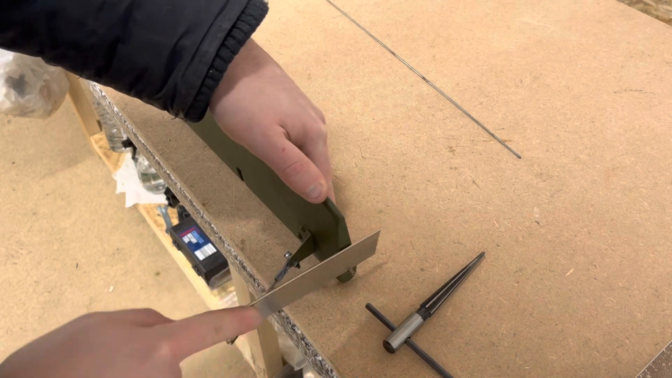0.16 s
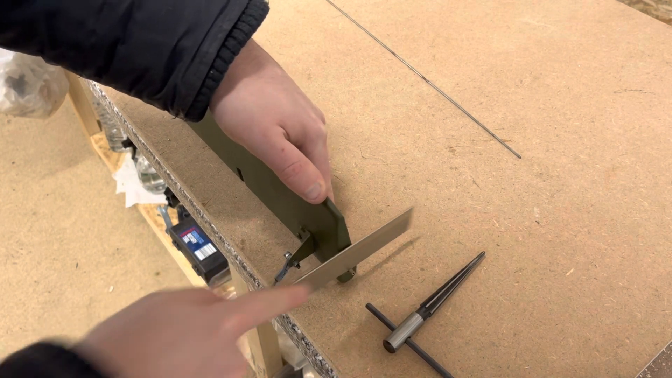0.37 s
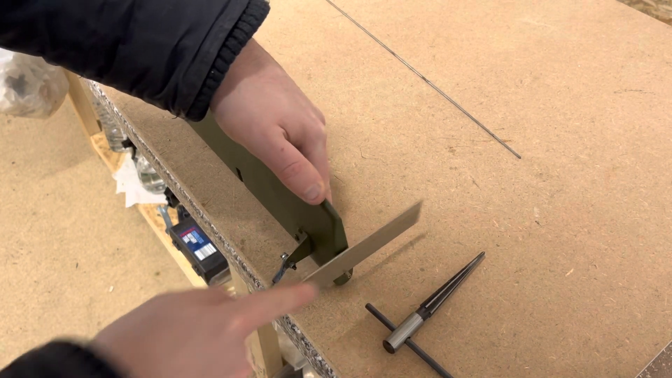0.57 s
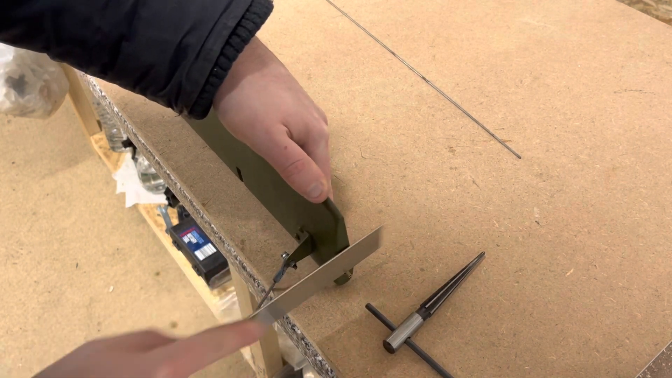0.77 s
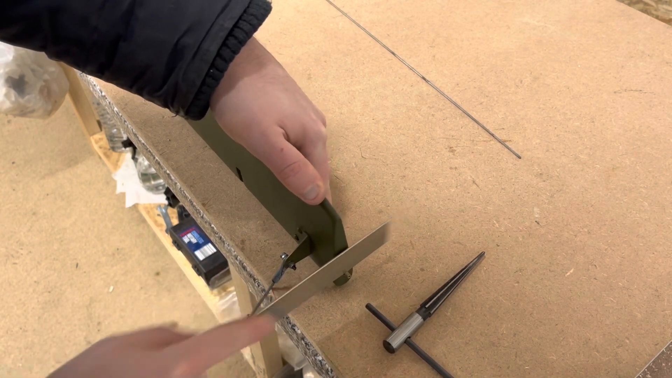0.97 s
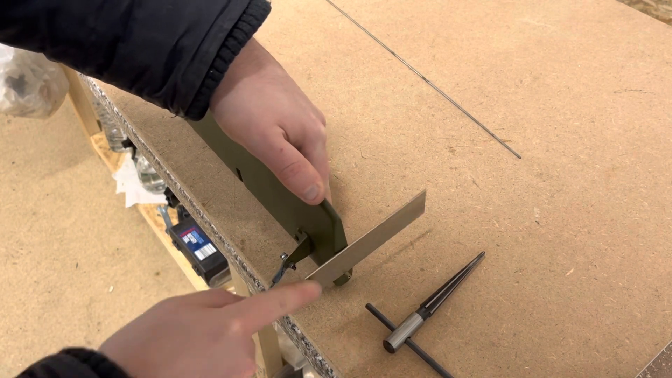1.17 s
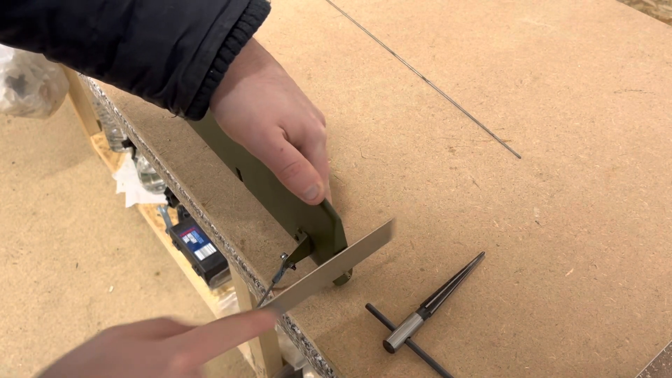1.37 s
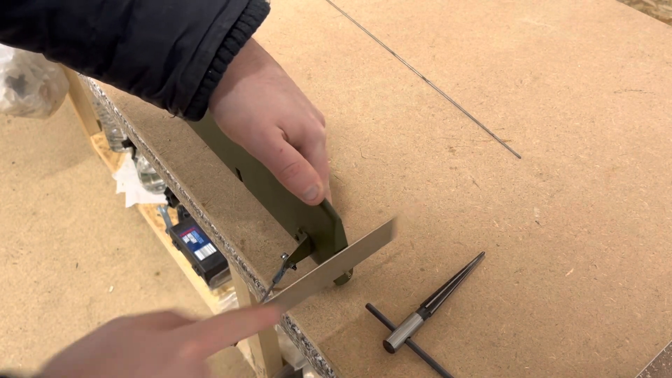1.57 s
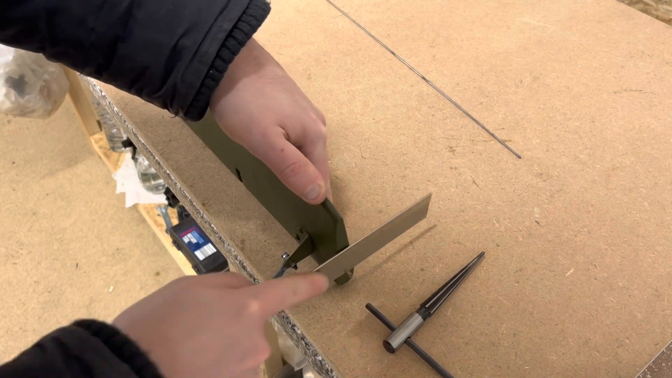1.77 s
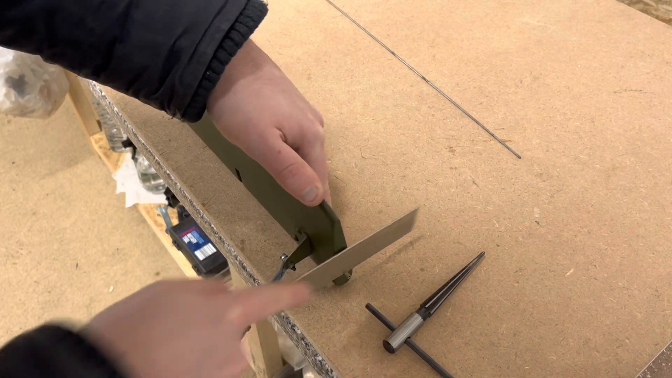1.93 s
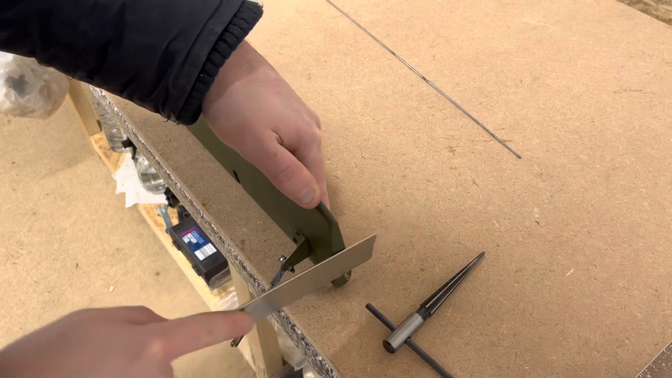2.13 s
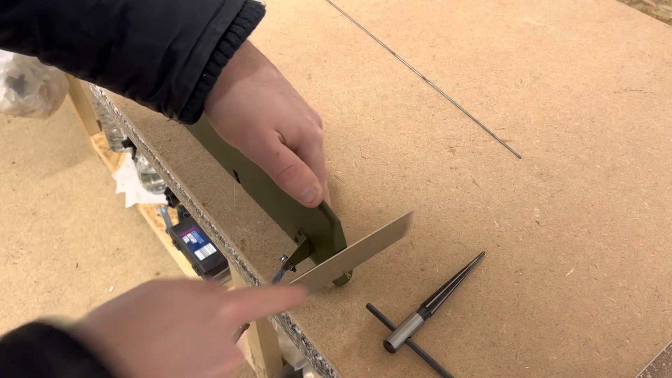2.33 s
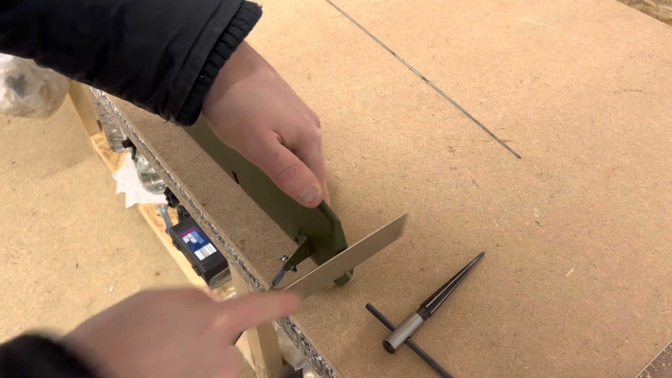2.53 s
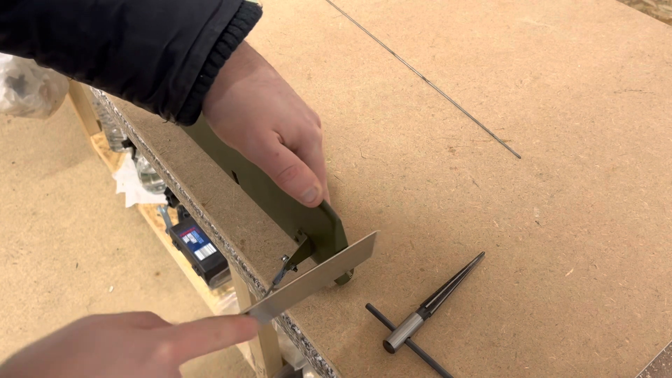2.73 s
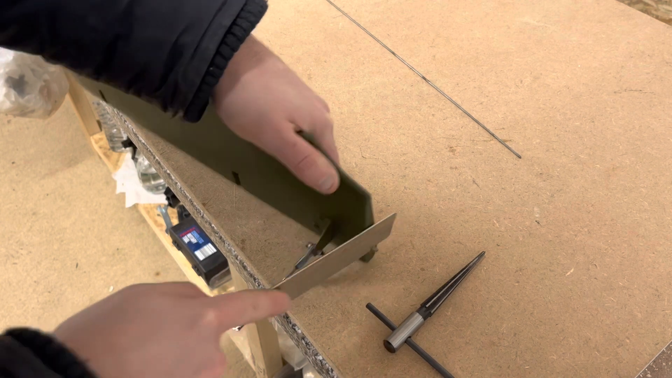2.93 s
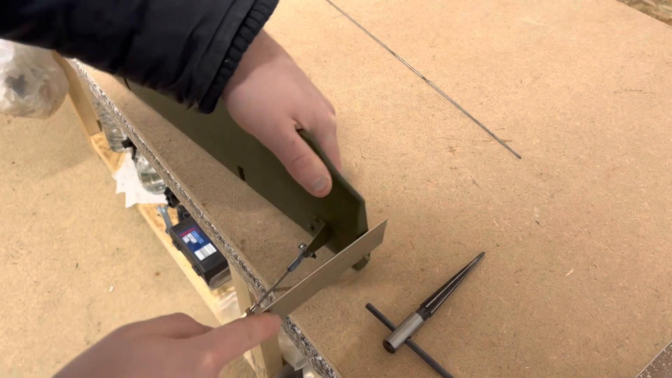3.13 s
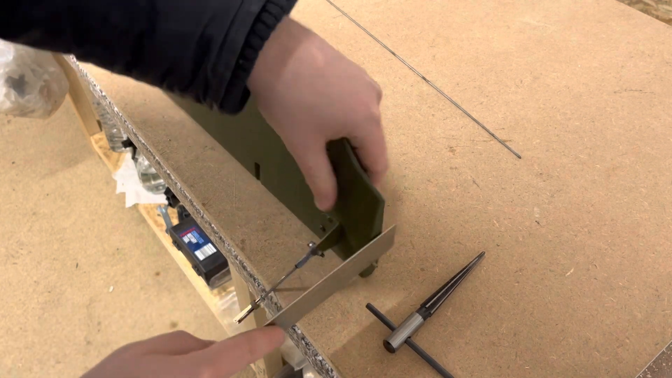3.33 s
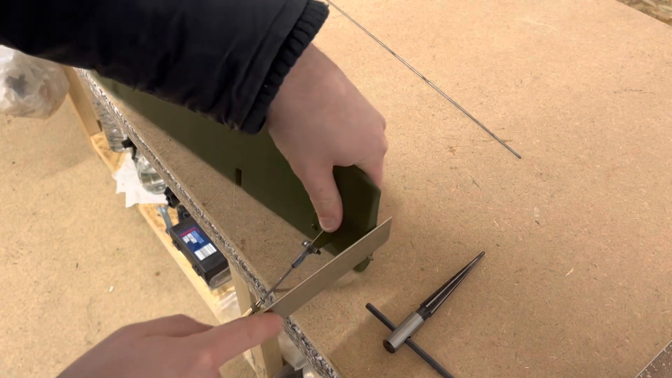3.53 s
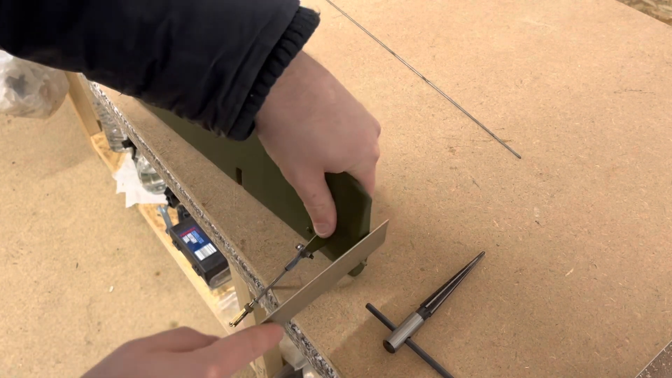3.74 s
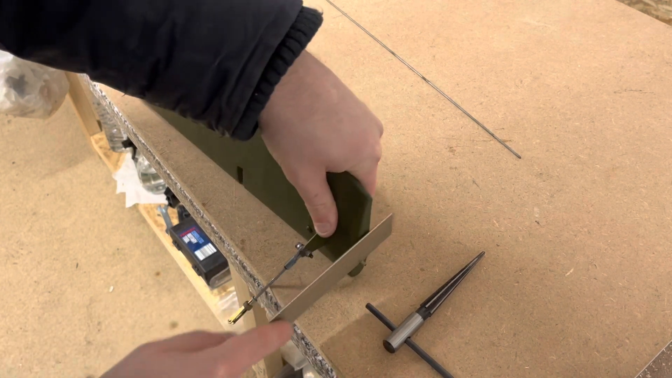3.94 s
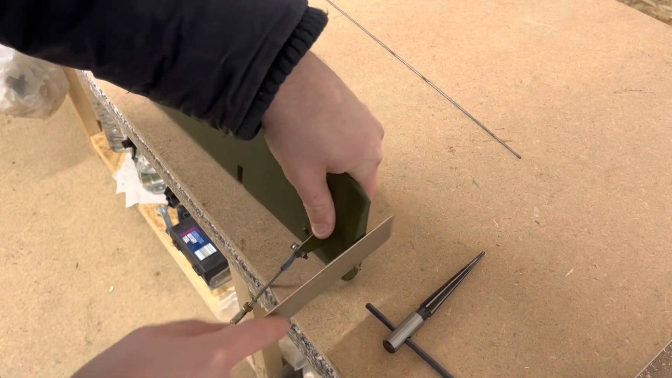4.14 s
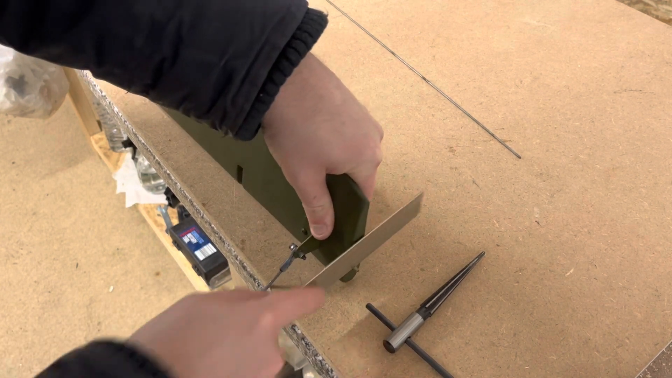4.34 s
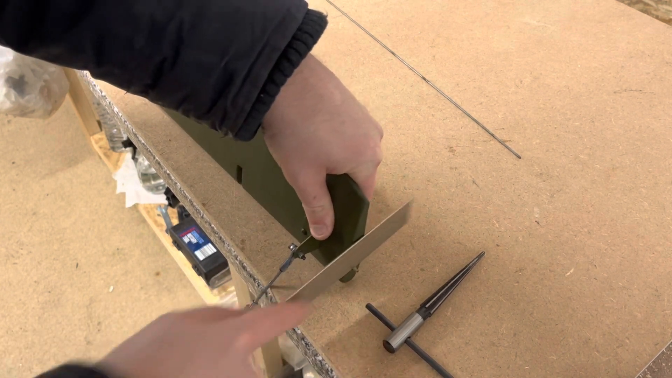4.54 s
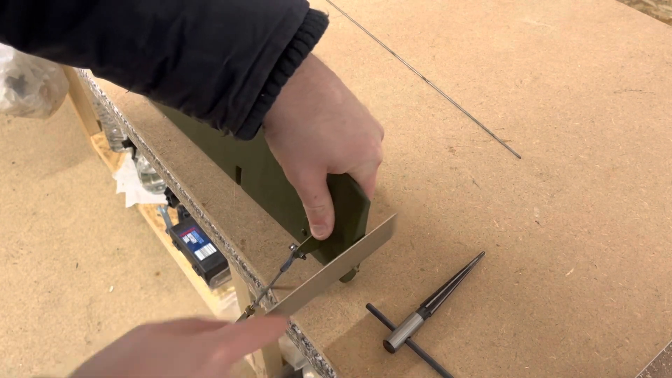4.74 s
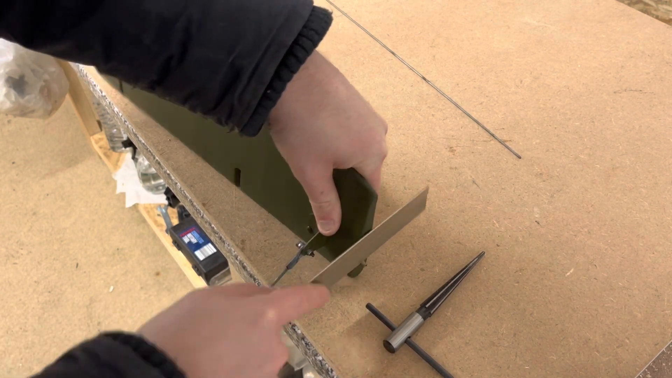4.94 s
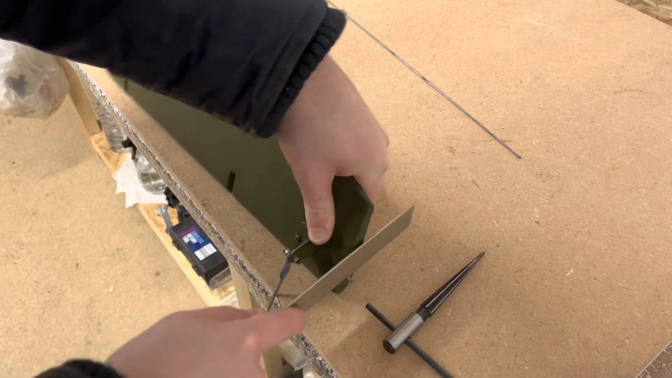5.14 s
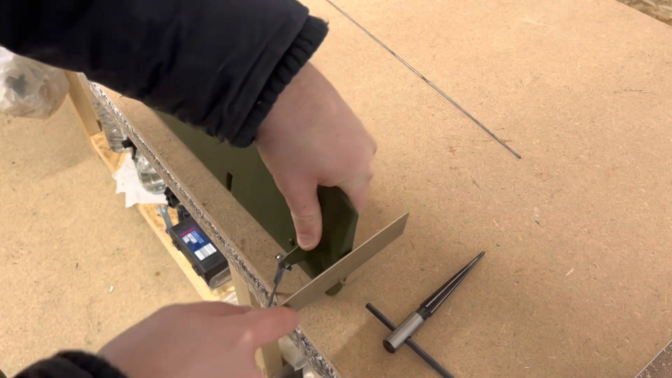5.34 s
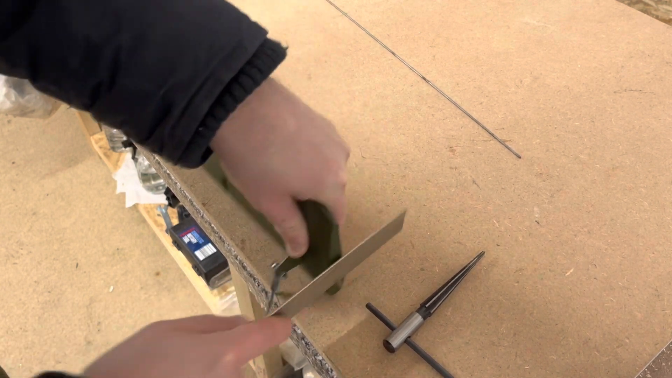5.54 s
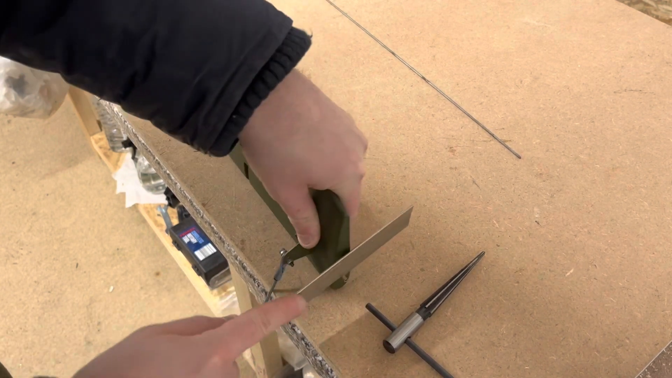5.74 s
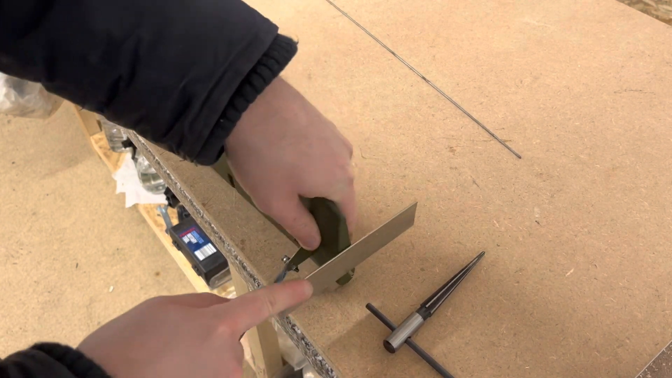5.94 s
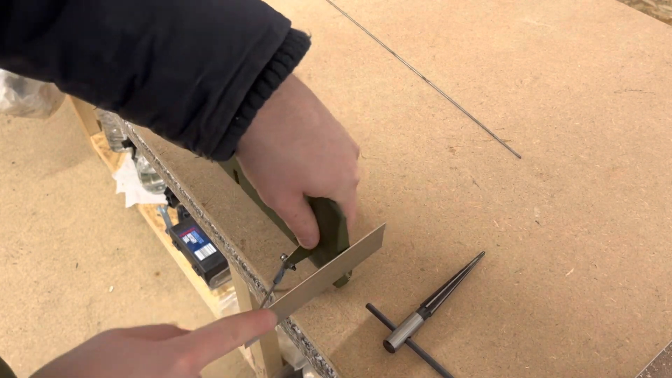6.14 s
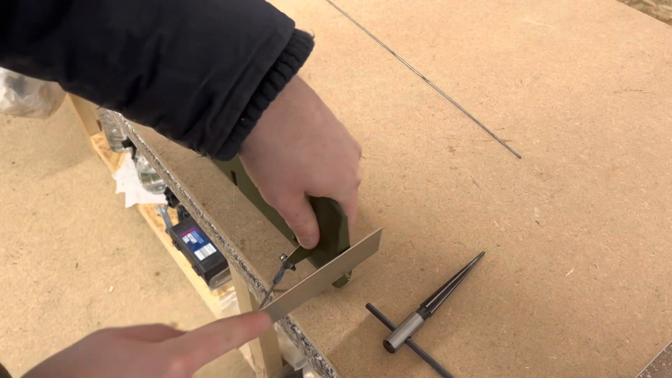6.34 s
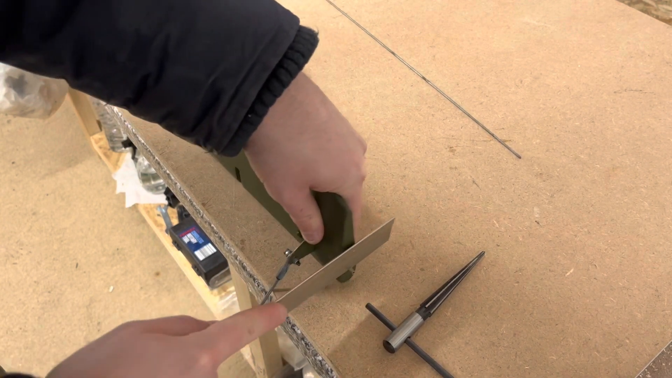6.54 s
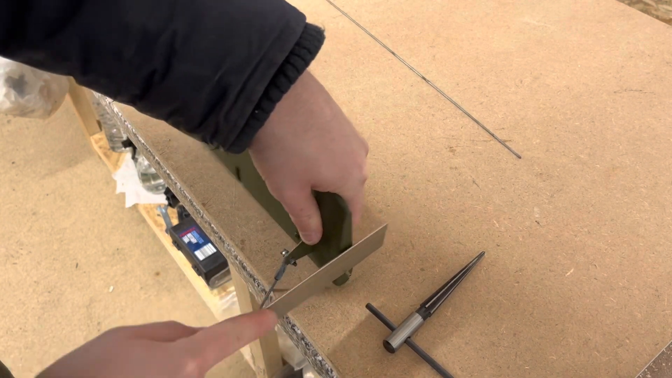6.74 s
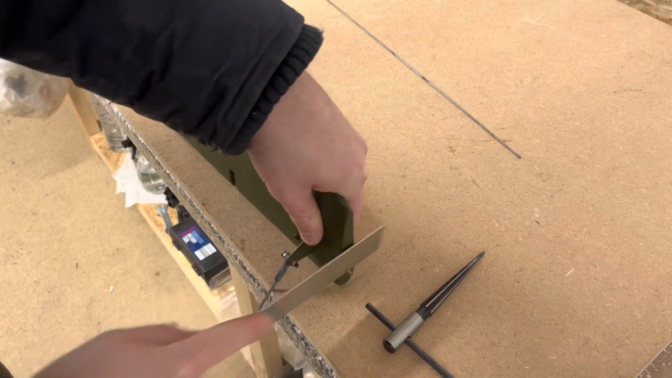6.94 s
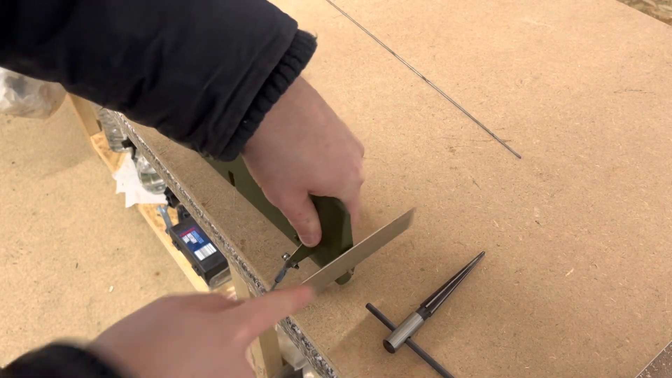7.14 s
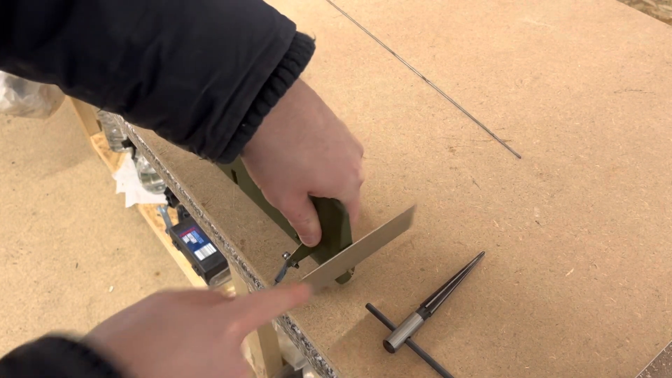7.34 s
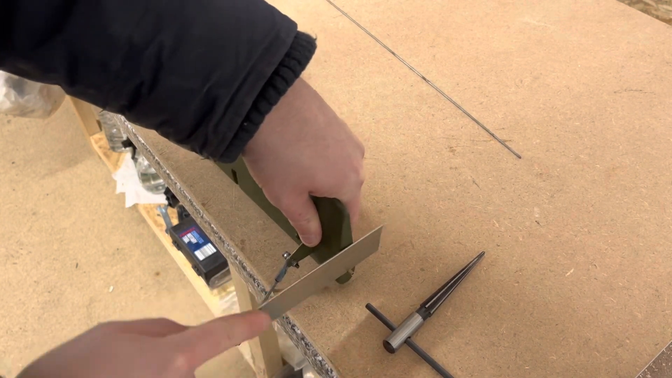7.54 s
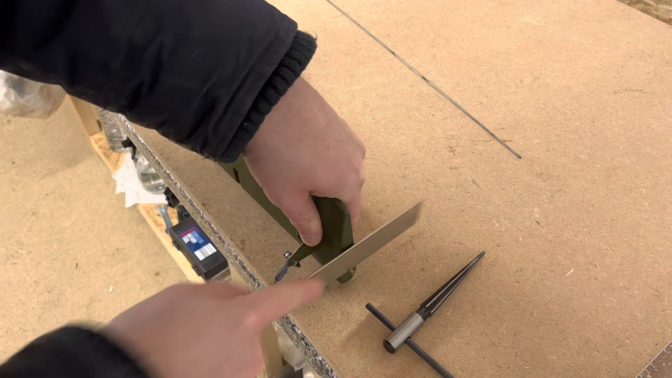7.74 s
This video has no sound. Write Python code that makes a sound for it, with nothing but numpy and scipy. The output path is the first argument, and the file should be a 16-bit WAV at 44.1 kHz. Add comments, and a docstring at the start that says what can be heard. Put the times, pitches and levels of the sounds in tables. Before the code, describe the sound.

Close up indoors, a fine-toothed saw cuts a small brass tube in very fast, even back-and-forth strokes, each a buzzy metallic chirp over gritty scraping. It stops for about a second with light rubs and clicks, resumes with more bench resonance, falters into weak strokes and knocks, rests again, then builds back to steady rapid sawing.

```python
"""Sawing a brass tube at the bench

A fine-toothed hand saw cuts a small brass tube held in a vice on a wooden bench, close to a phone.
In each stroke the blade speeds up and slows down: the pitch of the tooth strikes makes an arch over
a noisy metal scrape, while vice and bench answer lower down. In the pauses a hand rubs softly over
the vice, and in and around them small metal knocks sound. Short wall echoes and quiet air surround it."""
import sys
import numpy as np
from scipy import signal
from scipy.fft import rfft, irfft, next_fast_len
from scipy.io import wavfile
from scipy.ndimage import uniform_filter1d, map_coordinates

SR = 44100
rng = np.random.default_rng(int(sys.argv[2]) if len(sys.argv) > 2 else 0)


def waveform_to_disk(signal):
    """Save audio, clipped to [-1, 1], as 16-bit WAV at the path in sys.argv[1]."""
    frames = np.transpose(np.atleast_2d(signal))
    scaled = np.clip(frames, -1, 1) * 32767
    samples = np.round(scaled).astype(np.int16)
    wavfile.write(sys.argv[1], SR, samples)


N = 343980
TIME = np.arange(N) / SR

# Half strokes, mostly pushes and pulls; the faint rows at 4.954 and 5.03 s go with knocks:
# (start [s], basic top tooth rate [Hz], relative teeth level [dB], relative scrape level [dB])
STROKES = [(-.04, 1100, -29.5, -29), (.03, 1360, -25.5, -33), (.106, 1250, -26, -32),
           (.181, 1150, -28.5, -34), (.268, 1100, -30, -33), (.337, 1090, -26.5, -34.5),
           (.414, 786.4, -28, -33), (.485, 1000, -26.5, -37.5), (.561, 1130, -27.5, -32),
           (.64, 1080, -26.5, -32.5), (.719, 1150, -25.5, -33), (.795, 1160, -30, -34.5),
           (.877, 1090, -29, -34), (.952, 1080, -27.5, -37), (1.033, 1030, -30.5, -35.5),
           (1.101, 1140, -26.5, -34), (1.179, 1170, -27.5, -33), (1.254, 1140, -28.5, -33.5),
           (1.329, 1030, -26.5, -32.5), (1.403, 1110, -28.5, -33.5), (1.479, 1140, -31.5, -35),
           (1.553, 1120, -27, -32.5), (1.631, 1030, -29.5, -32.5), (1.703, 1080, -25, -31.5),
           (1.782, 1060, -24.5, -32.5), (1.852, 1070, -23.5, -32.5), (1.922, 1020, -28, -32),
           (1.995, 960, -23, -31.5), (2.071, 1320, -28.5, -26.5), (2.146, 1140, -28, -33),
           (2.221, 1210, -24.5, -27.5), (2.3, 1370, -23, -30), (2.372, 1140, -27.5, -28.5),
           (2.443, 1308, -24.5, -31), (2.534, 1032, -31.5, -32), (2.592, 1070, -25.5, -32),
           (2.671, 1200, -26.5, -27.5), (2.745, 1140, -23, -29.5), (2.819, 1060, -28.5, -29),
           (3.91, 1123, -29, -31), (4.045, 1050, -25.5, -31), (4.132, 1160, -26.5, -31),
           (4.215, 1050, -29, -30), (4.288, 1160, -26, -30.5), (4.364, 1120, -29, -30.5),
           (4.437, 1160, -28, -33.5), (4.51, 1070, -29, -30), (4.584, 1140, -27.5, -31),
           (4.66, 1140, -30, -31.5), (4.73, 1150, -29, -32), (4.804, 1099, -29.5, -29),
           (4.873, 1170, -31.5, -32.5), (4.954, 639.2, -43, -46), (5.03, 761.1, -58, -50.5),
           (5.128, 600.8, -31.5, -40), (5.173, 600.4, -33.5, -39.5), (5.255, 710, -38, -40),
           (6.0, 750.8, -40.5, -51.5), (6.066, 643, -38, -45), (6.158, 790, -31, -35.5),
           (6.254, 810, -30, -32), (6.348, 603.3, -33.5, -41), (6.57, 810, -32, -37.5),
           (6.661, 840, -34, -39), (6.757, 1050, -29, -32), (6.856, 1000, -33, -32), (6.932, 940, -29, -32),
           (7.015, 929.2, -31, -30), (7.09, 1150, -30.5, -31), (7.175, 1170, -31, -30),
           (7.251, 1160, -27.5, -30.5), (7.329, 1150, -29.5, -30), (7.402, 1200, -28.5, -30.5),
           (7.482, 1160, -26.5, -28), (7.55, 1140, -26, -30.5), (7.625, 962, -30, -32),
           (7.693, 1147, -27, -30), (7.765, 1215, -28, -31)]
# Resonances of blade and tube: (pitch [Hz], width [Hz], level [dB])
BLADE_MODES = [(762, 250, -2.5), (970, 163, 2), (1137, 130, 0), (1375, 35, 1), (1622, 63, -9.5),
               (1670, 23, -20), (2010, 176, -8.5), (2323, 210, -7.5), (2633, 196, -6.5)]
# Resonances of vice and bench top: (pitch [Hz], width [Hz], level [dB])
BENCH_MODES = [(283.2, 14.5, -2), (393, 48.5, -2.5), (476.5, 68, -1), (547.5, 45, 2), (602.5, 36, -1),
               (682, 60, -4), (752, 40, -10)]
# How much the vice passes to the bench, more once the hand grips it anew: (time [s], level [dB])
PASSED = [(0, -16), (2.9, -17), (3.9, -2.5), (4.2, -5), (6.3, 1.5), (7.15, -5), (7.8, -7)]
# Hard pushes that jolt the bench: (time [s], relative peak level [dB])
JOLTS = [(0.233, -41.5), (0.438, -41.5), (0.697, -43), (0.854, -45), (1.599, -45.5), (1.749, -44.5),
         (2.039, -42), (2.199, -42.5), (2.358, -44), (2.655, -45.5), (4.63, -41), (4.927, -42.5),
         (6.77, -53), (6.969, -51), (7.156, -42), (7.608, -39)]


def amp(db):
    """Turn decibels into a plain multiplier."""
    return 10 ** (np.asarray(db) / 20)


def unit(x):
    """Scale a signal to rms 1."""
    return x / np.sqrt(np.mean(x ** 2) + 1e-20)


def along(points, hz):
    """Read a value off (Hz, value) points on a log frequency axis."""
    f, v = np.transpose(points)
    return np.interp(np.log(hz + 1), np.log(f + 1), v)


def over_time(points):
    """Join (time, value) points with straight lines, one value a sample."""
    return np.interp(TIME, *np.transpose(points))


def wobble(rate):
    """A smooth random curve, with rate random points a second."""
    knots = rng.standard_normal(int(N * rate / SR) + 4)
    return map_coordinates(knots, [TIME * rate])


def filtered(x, response):
    """Multiply the spectrum of x by a response, a function of frequency."""
    m = next_fast_len(N + SR // 2)  # spare room at the end for ringing
    return irfft(rfft(x, m) * response(np.fft.rfftfreq(m, 1 / SR)), m)[..., :N]


def modes(table):
    """Response of a body that rings at several pitches; a wider resonance dies sooner."""
    def response(f):
        total = 0
        for k, (center, width, db) in enumerate(table):
            ring = 1j * f * width / (center * center - f * f + 1j * f * width)
            total = total + (-1) ** k * amp(db) * ring  # neighbours have opposite signs
        return total
    return response


def shape(points):
    """Response that follows (Hz, dB) points."""
    return lambda f: amp(along(points, f))


def played(source, gain, response):
    """Drive a body with source times gain; level is set before gain, so rings outlast the drive."""
    return filtered(source * gain, response) / np.std(filtered(source, response))


def patchy(x, patchy_db):
    """Vary the level at random in patches some 35 ms long and 700 Hz wide."""
    z = signal.stft(x, nperseg=256)[2]
    field = uniform_filter1d(rng.standard_normal(z.shape), 4, 0)
    field = uniform_filter1d(field, 12, 1)
    return signal.istft(z * amp(patchy_db * unit(field)), nperseg=256)[1][:N]


def leftward(x):
    """Place vice, bench and holding hand left of the blade by a level difference."""
    left_db = 2  # left minus right
    return x * amp([[left_db / 2], [-left_db / 2]])


def pulses(rows, form):
    """Add up form(seconds since the event), scaled by each row's level."""
    return sum(amp(db) * form(np.maximum(TIME - s, 0)) for s, db in rows)


def snag(t):
    """Extra pressure when teeth snag: a sudden rise that dies fast."""
    rise_s, t60_s, gain_db = 0.0018, 0.034, -6
    return (1 - np.exp(-t / rise_s)) * amp(gain_db - 60 * t / t60_s)


def jolt(t):
    """Swell and fade of a jolt, reaching 1 at its top."""
    top_s = 0.012
    return t / top_s * np.exp(1 - t / top_s)


def motion():
    """Progress 0-1 through the current row of STROKES, whether a rest follows, and that row, at each sample."""
    # Moments at which the blade comes to rest: time [s]
    stops = [2.91, 5.37, 6.43, 7.839]
    rows = np.array(STROKES)
    starts = rows[:, 0]
    marks = np.sort(np.r_[starts, stops])
    ends = marks[np.searchsorted(marks, starts, "right")]
    k = np.searchsorted(starts, TIME, "right") - 1
    u = np.clip((TIME - starts[k]) / (ends[k] - starts[k]), 0, 1)
    return u, np.isin(ends, stops)[k], rows[k].T


def pressure(u, last):
    """Pressure swells over each half stroke; the teeth skate, dig in at once, then ease off."""
    peak = np.where(last, 0.19, 0.44)  # share of the stroke; earlier before a rest
    lean = np.abs(np.sin(np.pi * u ** (np.log(.5) / np.log(np.clip(peak, .15, .85)))))
    past = u - 0.2  # the teeth dig in a fifth of the way through
    bite = np.exp(-2.6 * np.abs(past)) / (1 + np.exp(-past / 0.0026))
    return lean, bite


def tooth_strikes(turn, tooth, gate, press):
    """Teeth strike the tube wall one after another: a tone, its octave and noise ring the blade."""
    # Strength of the tooth tone's octave before its random flutter: (time [s], share)
    octave = [(0, 0.28), (1.6, 0.15), (2.9, 0.67), (3.97, 2.1), (4.05, 0.39), (7.06, 0.98), (7.125, 7),
              (7.18, .6), (7.24, .6), (7.28, 2.4), (7.34, 0.96), (7.8, 1.3)]
    # Noise added to the tooth tone: (time [s], share)
    grit = [(0, 1.8), (5, 1.6), (6.9, 2.7)]
    octave_gain = over_time(octave) * amp(1.1 * wobble(19))
    tone = np.cos(turn) + octave_gain * np.cos(2 * turn)
    noise = over_time(grit) * unit(gate * rng.standard_normal(N))
    return played(tone * amp(3.3 * tooth) + noise, press, modes(BLADE_MODES))


def scrape(tooth, gate, gain):
    """Chips tear off at each tooth: pulsing noise, coloured by the metal and the blade's upper rings."""
    # Colour of the scrape: (pitch [Hz], level per Hz [dB])
    chips = [(880, -24.5), (1500, 1.5), (1920, -7), (2310, -1), (2700, -13), (2810, -7), (2890, -2.5),
             (4680, -3), (7410, -13), (8500, -16.5), (13900, -25), (14700, -25), (15600, -81)]
    # Upper blade resonances: (pitch [Hz], width [Hz], relative level [dB])
    rings = [(3446, 16, -28), (3510, 160, 3), (4030, 120, -5), (4400, 39, -33)]
    unevenness = amp(1.26 * tooth + 0.89 * wobble(400))
    # the contact point moves along the blade, so the colour keeps changing
    tearing = patchy(gate * unevenness * rng.standard_normal(N), patchy_db=2.0)
    return played(tearing, gain, lambda f: shape(chips)(f) * (1 + modes(rings)(f) * 0.23))


def bench_answer(u, top_hz, teeth_db, turn, tooth, lean):
    """The vice passes tooth strikes to the bench top, which rings; a jolt makes the tooth tone groan there."""
    strength = 1.06 * (top_hz / 1100) ** 2  # fast teeth shake it more
    shove = np.cos(turn) * amp(3.9 * tooth) * strength + rng.standard_normal(N) * 3
    flutter_db = 2.5 * wobble(45)
    loaded = 1.11 + 0.3 * u  # the drive grows through each half stroke
    gain = amp(teeth_db + over_time(PASSED) + flutter_db) * lean ** 0.76 * loaded
    bench = played(shove, gain, modes(BENCH_MODES))
    groan_gain = amp(teeth_db + 41) * pulses(JOLTS, jolt) * lean
    groan = played(np.cos(turn) * amp(7.4 * tooth), groan_gain, modes(BENCH_MODES))
    return bench + groan


def saw():
    """Blade speed sets the tooth rate and pressure the loudness of strikes, scrape and bench."""
    # The teeth snag hard and the blade rings: (time [s], relative peak level [dB])
    catches = [(0.203, -5.5), (0.287, -11), (0.355, -21), (0.661, -20), (0.816, -8), (0.893, -15.5),
               (1.054, -13), (1.348, -22), (1.574, -12), (1.658, -8.5), (1.873, -27), (2.017, -24),
               (2.167, -7.5), (2.24, -11.5), (2.394, -14), (2.465, -16), (2.765, -16.5), (4.07, -22),
               (4.527, -10), (6.26, -9.5)]
    u, last, (_, top_hz, teeth_db, scrape_db) = motion()
    lean, bite = pressure(u, last)
    speed = np.abs(np.sin(np.pi * u ** .92))  # under 1: fastest before mid-stroke, longer slowing
    tooth_rate = top_hz * speed ** .8 * (1 + .062 * wobble(160))
    turn = 2 * np.pi * np.cumsum(tooth_rate) / SR
    tooth = rng.standard_normal(N)[(turn / (2 * np.pi)).astype(int)]  # no two teeth bite alike
    gate = np.exp(0.36 * np.cos(turn))  # noise pulses with each tooth
    catch = wobble(70)  # the blade catches and frees
    snags = pulses(catches, snag)

    press = amp(teeth_db + 4.0 + 2.13 * catch) * lean ** 0.84 * (0.34 + 0.65 * bite)
    teeth = tooth_strikes(turn, tooth, gate, press + snags)
    contact = lean ** 1.12 * (0.69 + 0.12 * bite) + 0.045 * (u < 1)
    scrape_gain = amp(scrape_db + 6.0 + 0.68 * catch) * contact + 0.15 * snags
    chips_sound = scrape(tooth, gate, scrape_gain)
    return teeth + chips_sound + leftward(bench_answer(u, top_hz, teeth_db, turn, tooth, lean))


def rocking():
    """The bench legs rumble, swelling once for every two rows of STROKES, and ring low at each jolt."""
    # Colour of the bench legs: (pitch [Hz], level per Hz [dB])
    legs = [(25, -1.5), (48, -45), (75, -7), (115, -0.5), (165, -7), (240, -6.5), (400, -91)]
    jolt_hz = 112.8
    u, _, (_, _, _, scrape_db) = motion()
    count = np.interp(TIME, [row[0] for row in STROKES], np.arange(len(STROKES)))
    effort = uniform_filter1d(amp(0.5 * scrape_db) * (u < 1), size=2000)  # harder strokes rumble more
    sway_db = 2.8 * np.cos(np.pi * count + .4) + 3.8 * wobble(19)
    gain = effort * amp(-39.0 + sway_db + 0.14 * over_time(PASSED))
    rumble = played(rng.standard_normal(N), gain, shape(legs))
    jolts = pulses(JOLTS, lambda t: jolt(t) * np.sin(2 * np.pi * jolt_hz * t))
    return rumble + amp(1.5) * jolts


def workshop_air():
    """The quiet workshop is steady noise, strongest in the bass."""
    # Colour of the air: (pitch [Hz], level per Hz [dB])
    air_colour = [(40, -26), (100, -9.5), (220, -17), (450, -14), (900, -27.5), (14400, -51.5),
                  (15200, -71)]
    return amp(-57.5) * unit(filtered(rng.standard_normal(N), shape(air_colour)))


def hand():
    """Skin and sleeve slide over the vice while the saw rests, each rub one swell; the bench hums along."""
    # Soft rubs in the pauses: (start [s], length [s], relative level [dB])
    rubs = [(2.898, 0.044, -34), (2.942, 0.074, -40), (3.055, 0.5, -53.5), (3.474, 0.11, -51),
            (3.632, 0.041, -55), (3.718, 0.21, -50), (5.364, 0.099, -41), (5.48, 0.12, -41),
            (5.615, 0.12, -53), (5.767, 0.031, -51.5), (5.835, 0.13, -53.5), (6.43, 0.17, -56)]
    # Colour of skin and sleeve: (pitch [Hz], level per Hz [dB])
    skin_colour = [(600, -4.5), (1200, -5.5), (3000, -9), (4800, -5.5), (6300, -8.5), (8500, -12.5),
                   (14300, -22), (15200, -45)]
    rub = np.zeros(N)
    for start, length, db in rubs:
        rub += amp(db) * np.abs(np.sin(np.pi * np.clip((TIME - start) / length, 0, 1)))
    rustle = patchy(rng.standard_normal(N), patchy_db=3.5)
    skin = played(rustle, rub * amp(-5.0 + 2.4 * wobble(100)), shape(skin_colour))
    push = rub ** 0.89 * amp(-15.0 + 1.0 * wobble(43))  # the hum swings less than the rub
    return skin + played(rng.standard_normal(N), push, modes(BENCH_MODES + BLADE_MODES[:3]))


def knocks():
    """Metal touches metal: a noisy crack and rattle, and a blow that rings bench and blade."""
    # Small contacts: (time [s], relative click level [dB], bench level against the click [dB])
    contacts = [(2.9257, -36, -0.5), (3.0593, -51.5, -1.5), (3.0762, -55, -11), (3.1747, -26.5, -10),
                (3.672, -49.5, 14), (3.679, -45, -14), (3.686, -32, -8.5), (3.735, -38.5, -1),
                (4.9662, -20.5, -15.5), (5.0404, -30, -3.5), (5.1384, -28.5, -1), (5.2765, -26, -0.5),
                (5.654, -49.5, 4), (5.8133, -44, -7.5), (5.855, -41.5, -8), (5.916, -48, -5),
                (6.4553, -40.5, -11), (6.5745, -25.5, -2)]
    rise_s, crack_t60_s, rattle_t60_s, blow_t60_s = 0.0032, 0.012, 0.041, 0.1
    crack, blow = np.zeros(N + SR), np.zeros(N + SR)
    t = np.arange(SR // 6) / SR
    rise = 1 - np.exp(-t / rise_s)
    for s, click_db, bench_db in contacts:
        span = slice(round(s * SR), round(s * SR) + len(t))
        rattle_gain = rise * amp(click_db - 5.5 - 60 * t / rattle_t60_s)
        crack_gain = amp(click_db - 3.0 - 60 * t / crack_t60_s)
        crack[span] += (rattle_gain + crack_gain) * rng.standard_normal(len(t))
        blow_gain = rise * amp(click_db + bench_db + 26.0 - 60 * t / blow_t60_s)
        blow[span] += blow_gain * rng.standard_normal(len(t))
    bright = filtered(crack[:N], lambda f: 1j * f / 900 / (1 + 1j * f / 3500) ** 3)
    return bright + filtered(blow[:N], lambda f: modes(BENCH_MODES)(f) + 0.26 * modes(BLADE_MODES)(f))


def walls(x):
    """Walls return a short tail of fading noise in each channel; three random tails cross-fade in turn."""
    # Colour of the walls: (pitch [Hz], level [dB])
    wall_colour = [(100, -19), (250, -12.5), (800, -1), (2500, 4.5), (5500, -6.5), (14000, 5)]
    # Time for the tail to fall by 60 dB: (pitch [Hz], time [s])
    decay = [(200, 0.26), (2000, 0.079), (10000, 0.13)]
    out = np.zeros((2, N))
    for k in range(3):
        hz, t, z = signal.stft(rng.standard_normal((2, SR // 3)), SR, nperseg=256)
        fading = z * amp(-60 * t / along(decay, hz)[:, None])
        tail = signal.istft(fading, SR, nperseg=256)[1]
        tail = tail / np.linalg.norm(tail[0])
        part = x * np.cos(np.pi * (TIME * 1.6 + k / 3)) ** 2 / 1.5  # the three shares add up to x
        delayed = np.pad(part, (200, 0))[None]  # samples
        out += signal.fftconvolve(delayed, tail, axes=1)[:, :N]
    return filtered(out, shape(wall_colour))


def ports(x):
    """Two microphone openings: each frequency arrives with its own lead and balance."""
    # How far left leads right: (pitch [Hz], phase [radians])
    lead = [(400, -.1), (1100, -1.2), (1720, -.1), (2650, -.1), (3000, 2.5), (3400, 0), (6300, 1.1),
            (9000, .3), (12800, -.6), (15000, -3.2)]
    # Left level minus right level: (pitch [Hz], difference [dB])
    tilt = [(150, 0), (330, -1), (700, 6.5), (1250, -0.5), (4000, -0.5), (8500, 4.5), (15000, 2)]
    side = np.array([[.5], [-.5]])
    return filtered(x, lambda f: amp(side * along(tilt, f)) * np.exp(1j * side * along(lead, f)))


def scene():
    """Mix the near sounds and air, straight and by way of the walls."""
    near = saw() + rocking() + leftward(hand() + knocks())
    air = workshop_air()
    return ports(near + air) + walls(near.mean(axis=0) + air)


def record(dry):
    """The phone thins the deep bass and keeps nothing above its band limit."""
    top_hz, bass_hz = 15760, 70
    return filtered(dry, lambda hz: (hz < top_hz) / (1 - 1j * bass_hz / (hz + 1)) ** 2)


dry = scene()
out = record(dry)
waveform_to_disk(out)
```